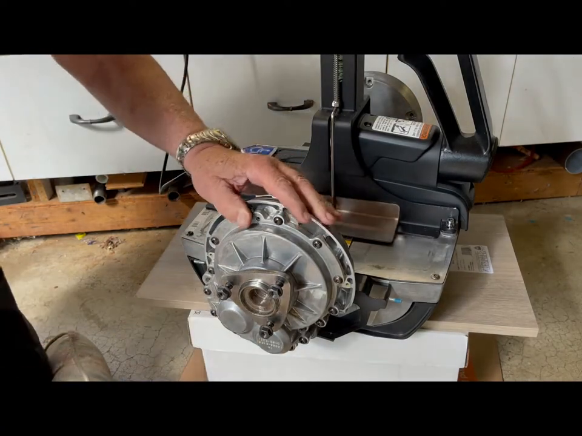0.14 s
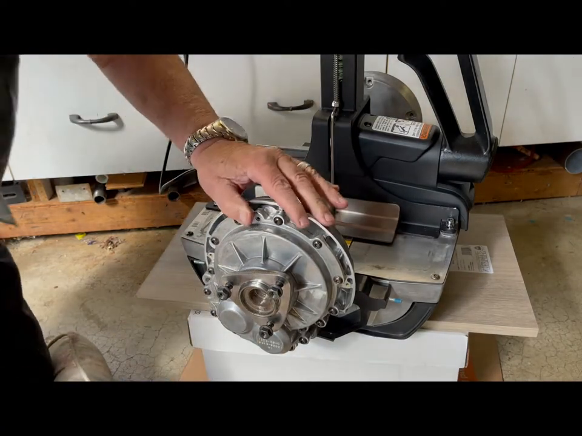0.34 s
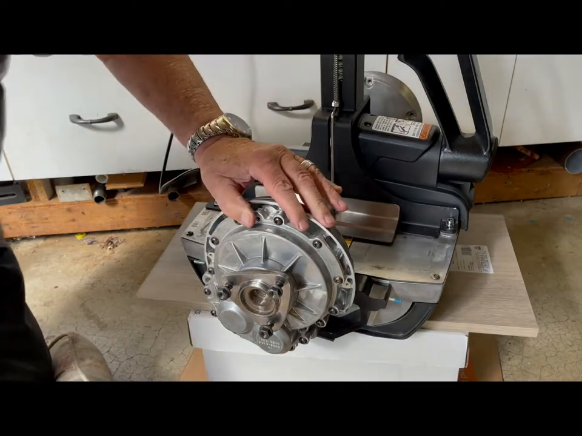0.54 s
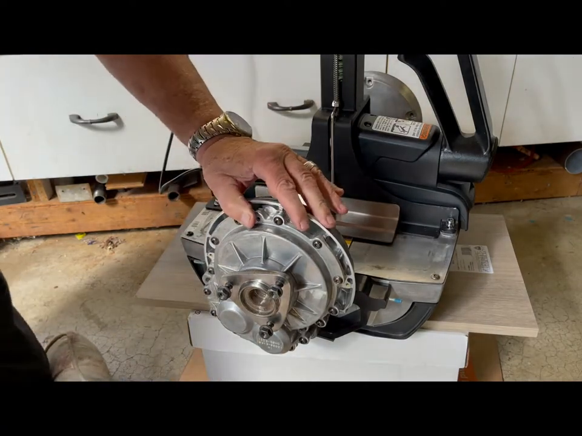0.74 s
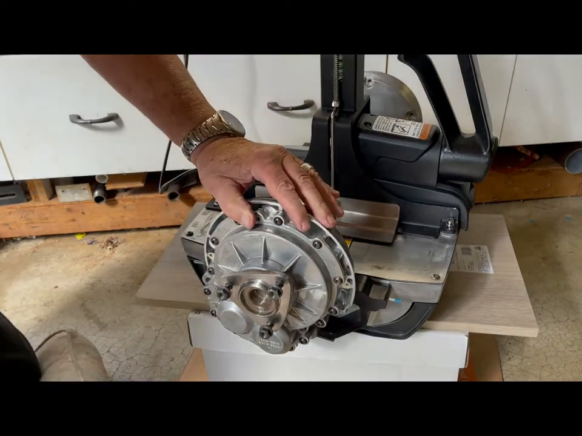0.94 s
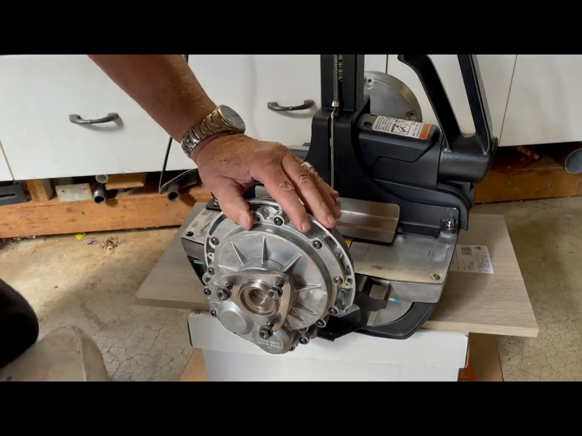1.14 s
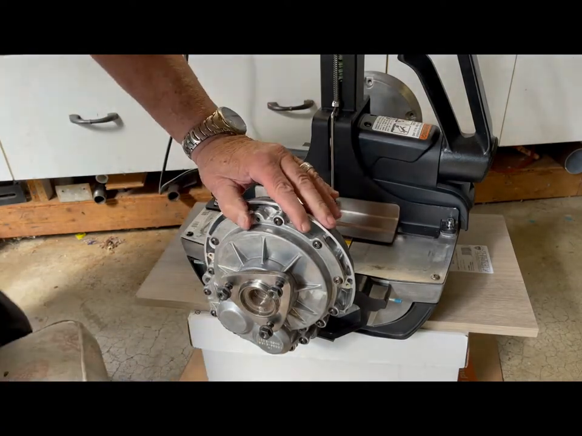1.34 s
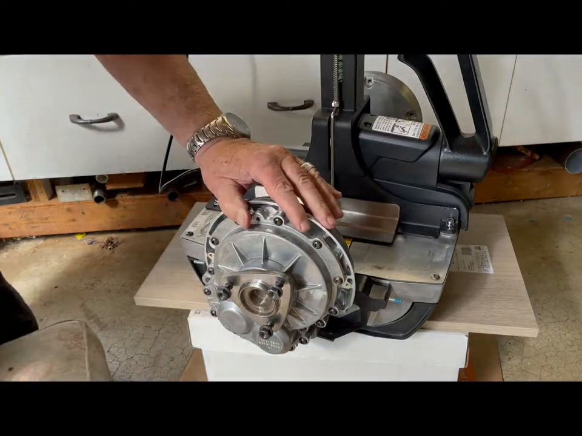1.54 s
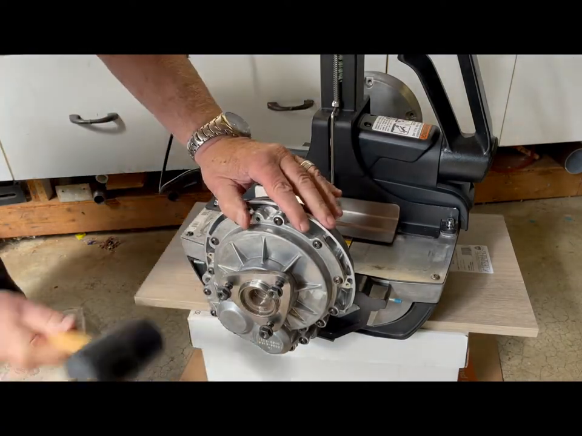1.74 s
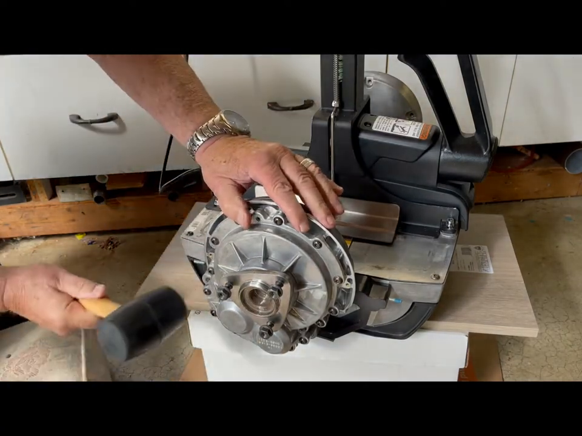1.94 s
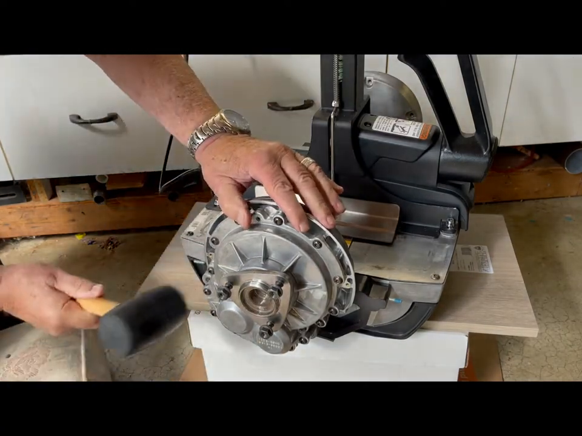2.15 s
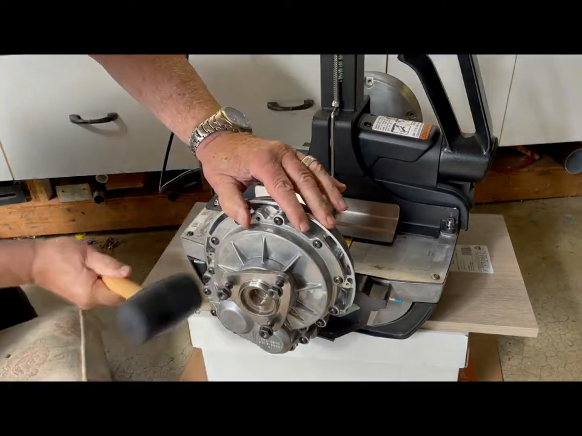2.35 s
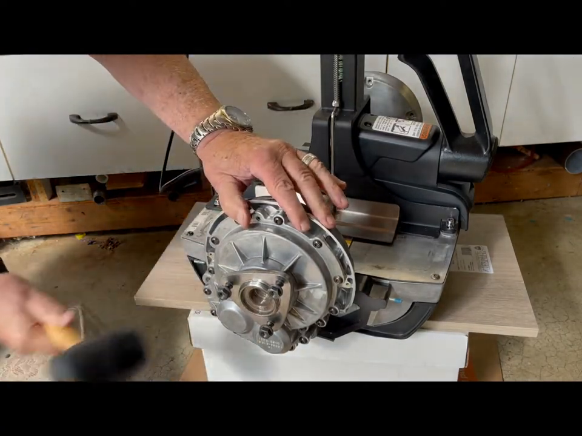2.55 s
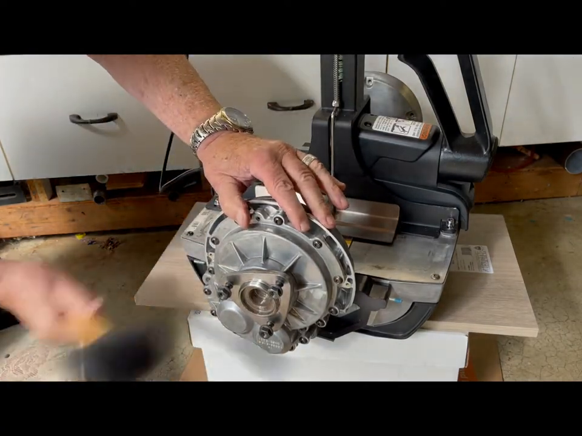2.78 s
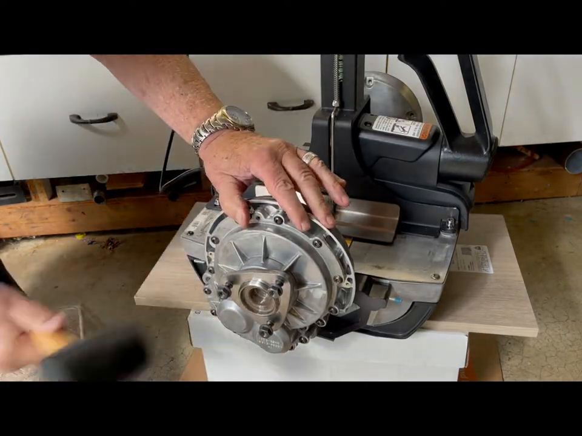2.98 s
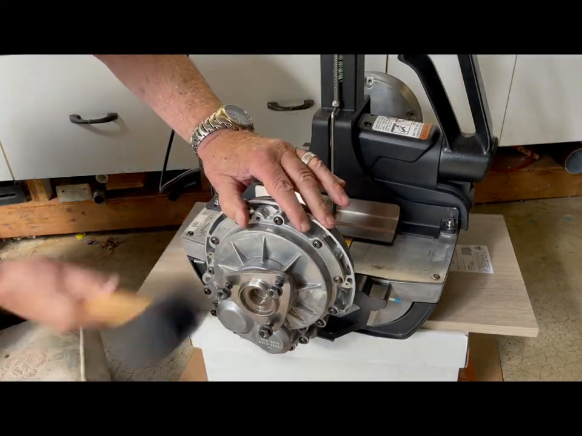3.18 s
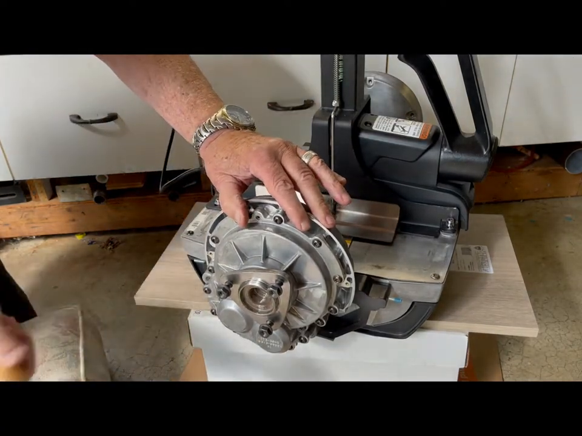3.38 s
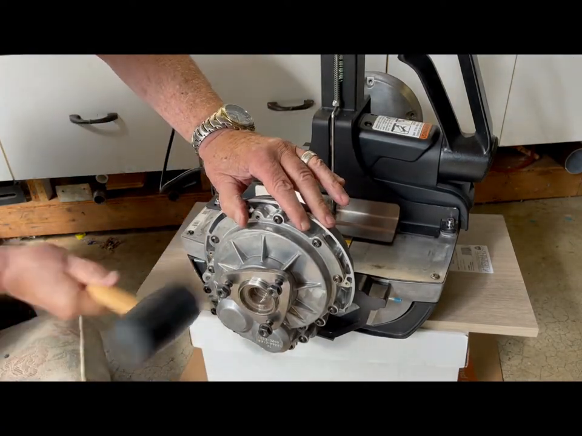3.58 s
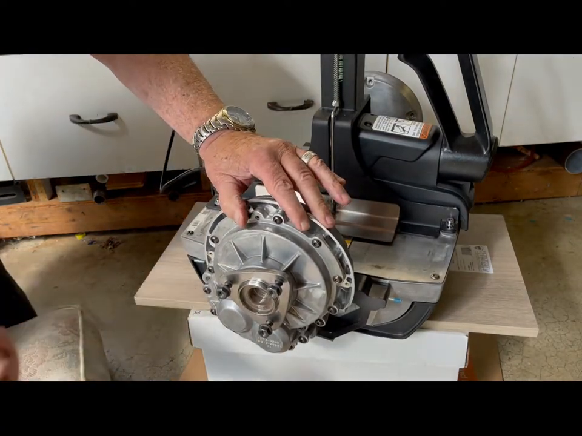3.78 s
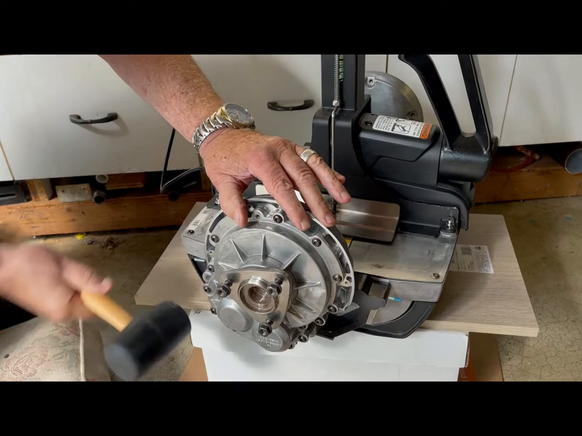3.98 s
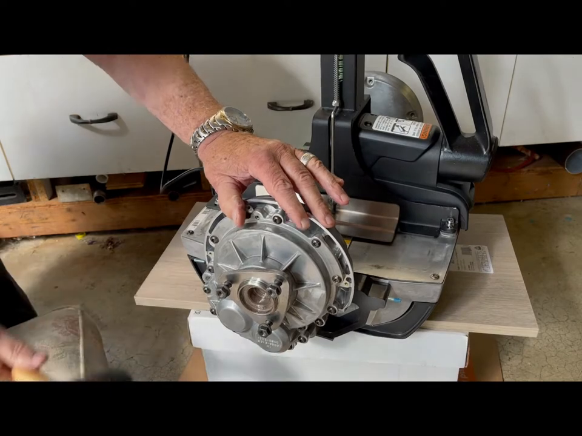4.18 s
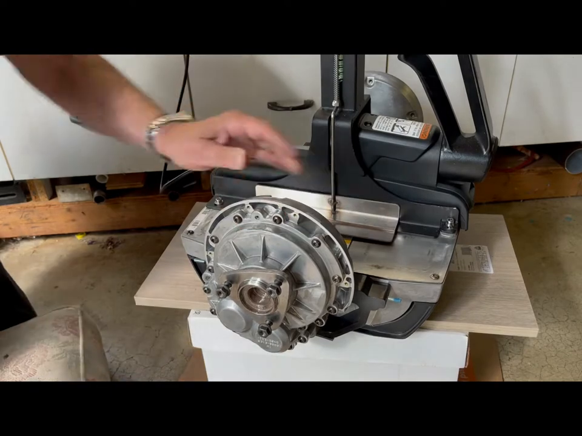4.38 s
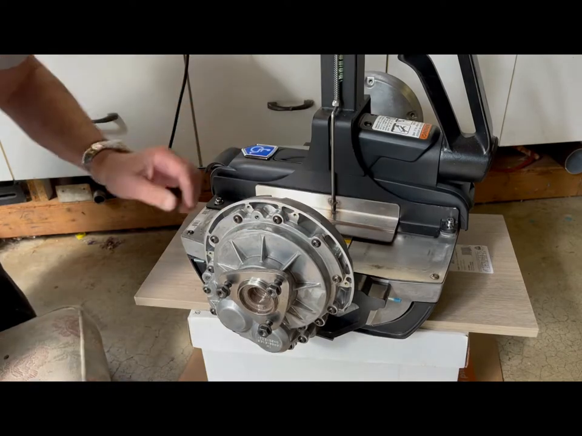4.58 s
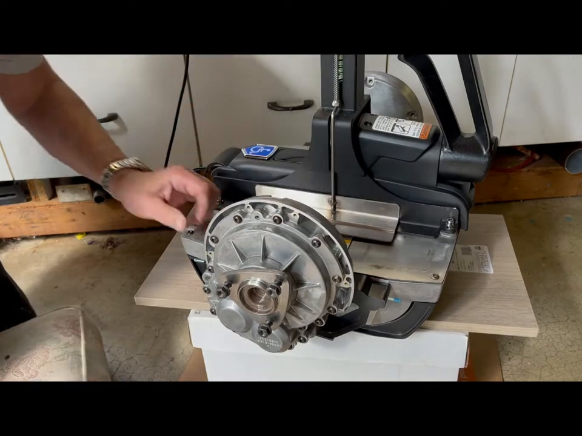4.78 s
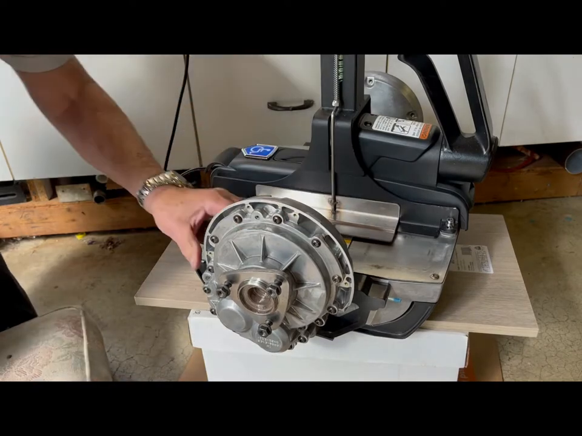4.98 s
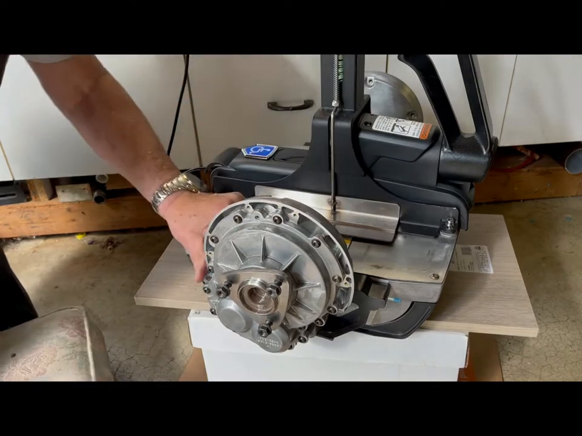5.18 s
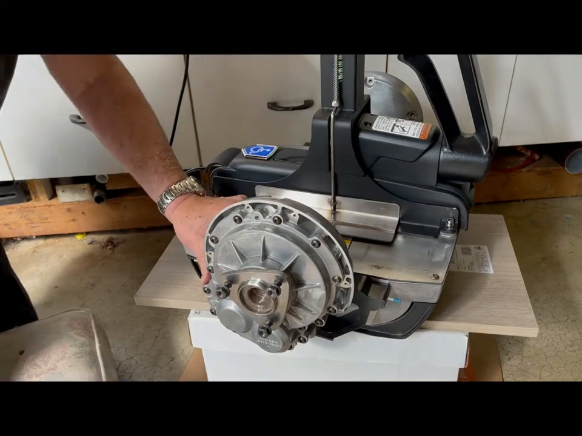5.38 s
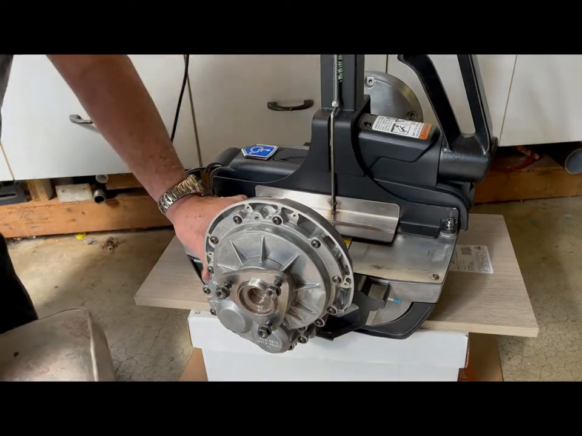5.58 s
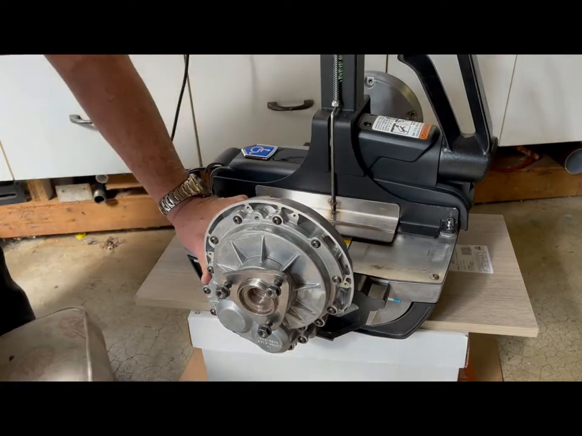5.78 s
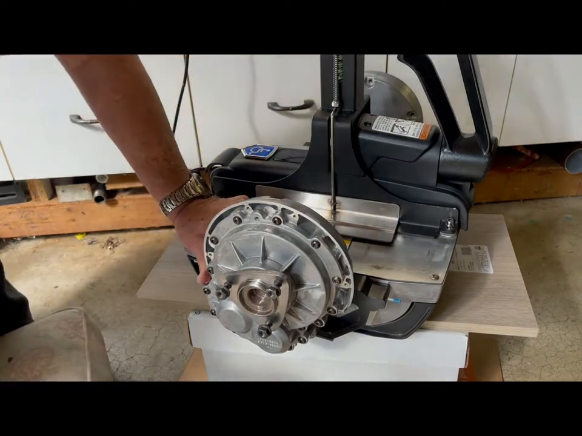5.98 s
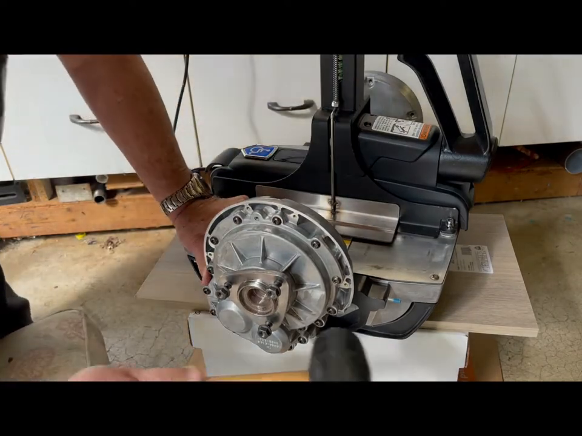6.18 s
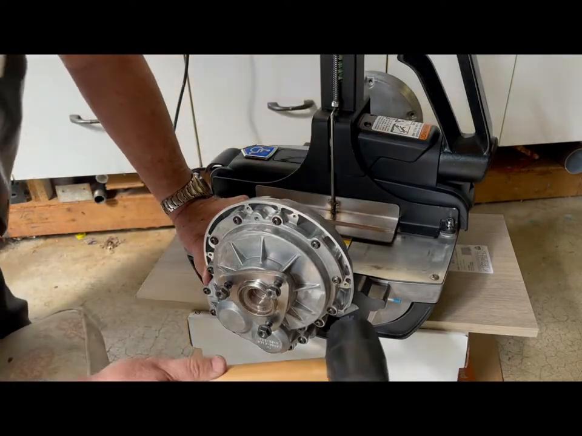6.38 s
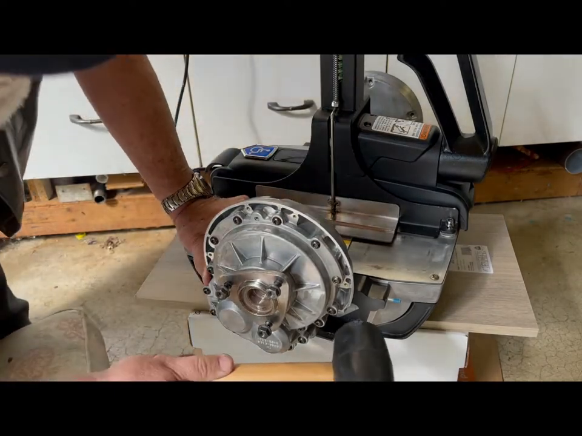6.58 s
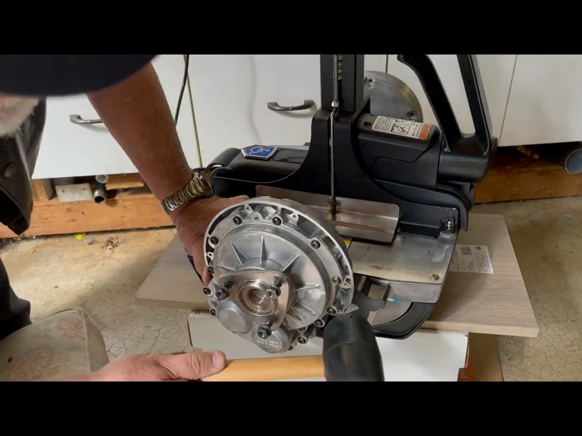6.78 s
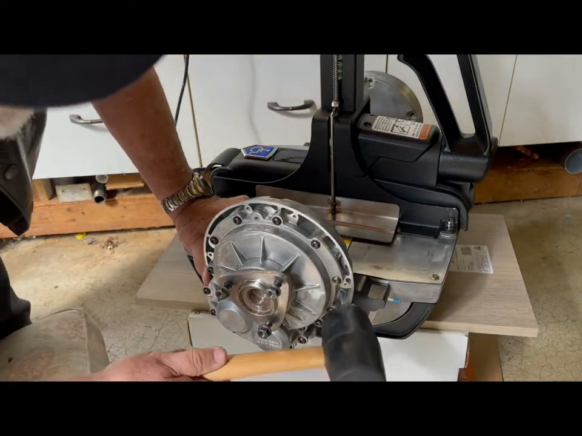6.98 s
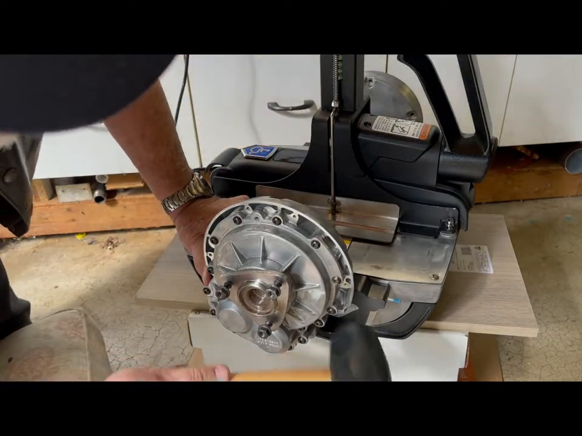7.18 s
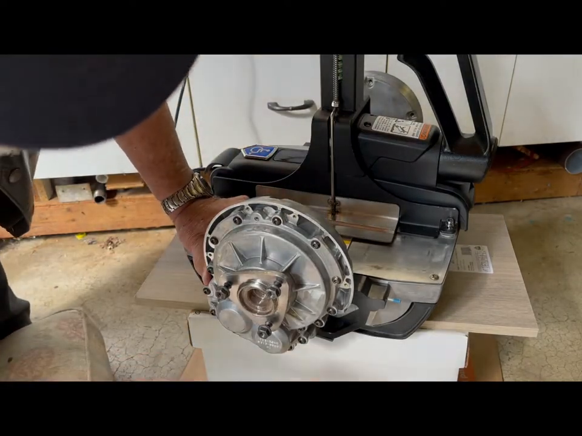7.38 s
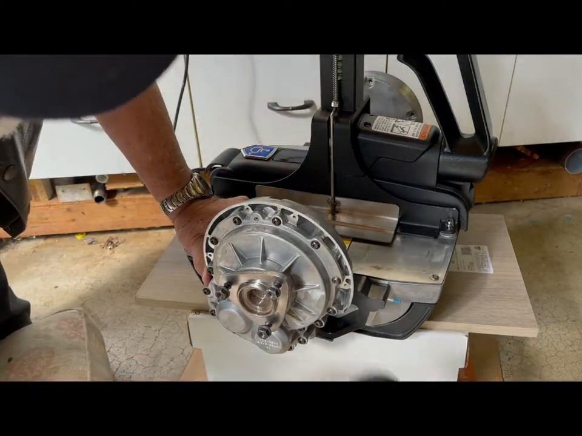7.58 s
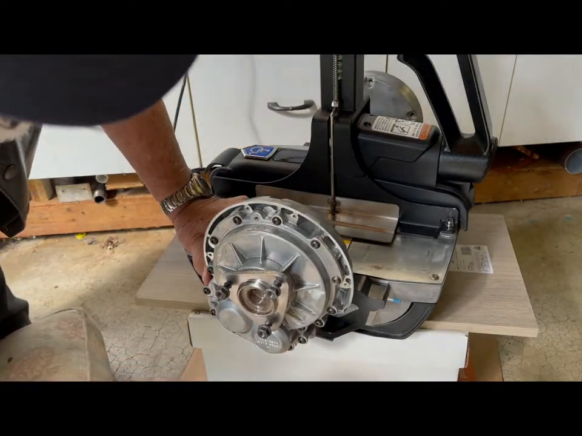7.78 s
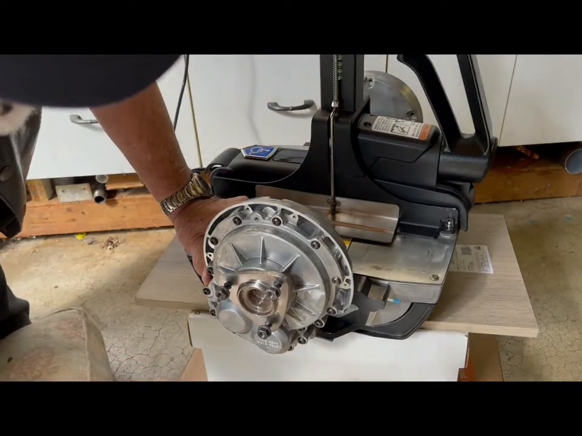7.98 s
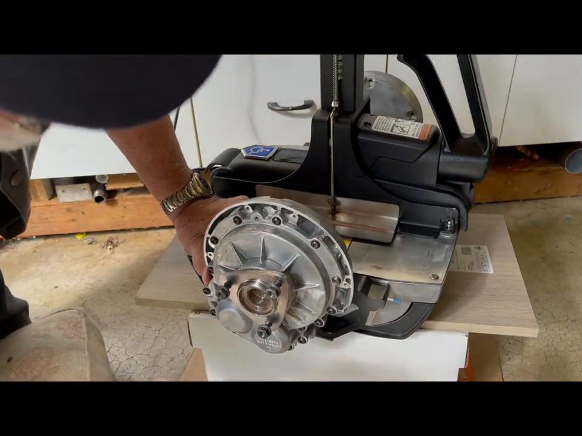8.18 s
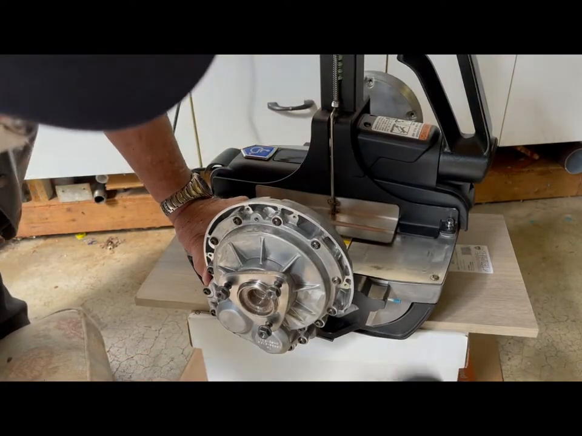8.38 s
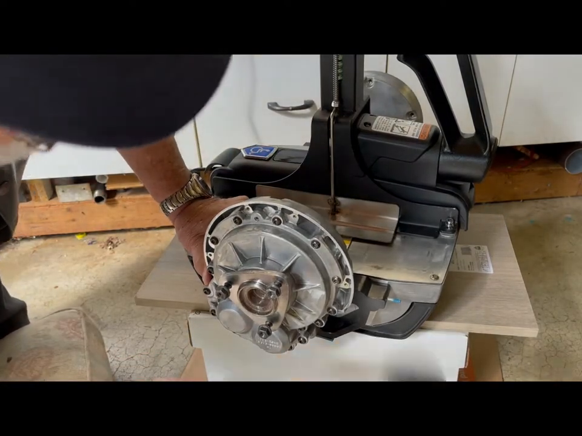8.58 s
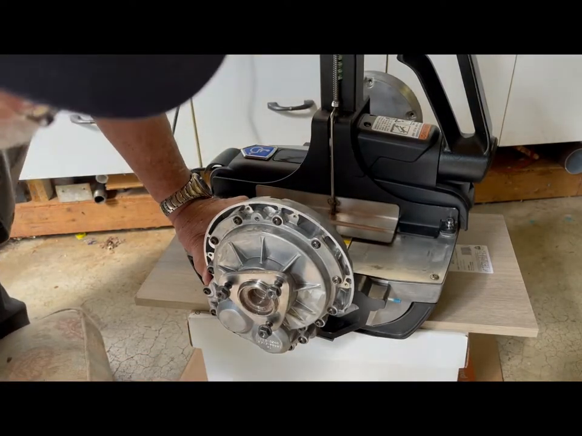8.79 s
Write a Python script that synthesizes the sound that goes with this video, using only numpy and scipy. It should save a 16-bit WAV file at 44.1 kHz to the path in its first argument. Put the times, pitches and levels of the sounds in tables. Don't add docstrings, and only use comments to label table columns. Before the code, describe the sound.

Stereo close pickup, slightly stronger on the left, short room reflections. Soft knocks and crisp cloth movement open, with a brief stuttering scrape gliding upward. Five spaced rubber mallet blows follow on a hollow metal casting resting on a board, hard thunks with brief metallic ring and faint shivering of thin sheet metal. A quieter handling pause has a light clink and rustle, then four evenly spaced blows finish, boardy and rattling.

```python
import sys
import numpy as np
from scipy import signal
from scipy.fft import rfft, irfft, next_fast_len
from scipy.io import wavfile
from scipy.ndimage import uniform_filter1d, map_coordinates

SR = 44100
rng = np.random.default_rng(int(sys.argv[2]) if len(sys.argv) > 2 else 0)


def natural_amplitude(level_db):
    exponent = np.asarray(level_db, float) / 20
    return 10 ** exponent


def int16_out(signal):
    q = np.round(np.clip(np.atleast_2d(signal).T, -1, 1) * 32767)
    wavfile.write(sys.argv[1], SR, q.astype(np.int16))


N = 389830

# [f/Hz, level/dB per Hz]
RUMBLE_SPECTRUM = [(12, -79.5), (20, -49), (43, -3.5), (108, 3.5), (146, -9), (183, -6), (239, -12.5),
                   (275, -8), (350, -17), (460, -52.5), (770, -120)]
# [f/Hz, level/dB per Hz]
WASH_SPECTRUM = [(210, -34.5), (350, -7.5), (439, -5.5), (600, -9), (771, -5), (1210, -8.5), (2730, -27.5),
                 (6410, -48.5), (7000, -65.5), (9100, -84), (15400, -120)]
# [t/s, level/dB]
WASH_LEVEL = [(0, -60.5), (.8, -63), (1.75, -61), (2.2, -63.5), (4.87, -61.5), (6.3, -60.5), (7.9, -58),
              (8.84, -56.5)]
# [f/Hz, T60/s]
ROOM_T60 = [(80, 0.29), (400, 0.29), (1500, 0.26), (5000, 0.29), (11000, 0.33)]
# [f/Hz, correlation/1]
CORRELATION = [(60, 1), (150, 0.84), (380, 0.37), (950, -0.26), (2380, 0.32), (5980, 0.67), (8500, 0.98),
               (15000, 0.77)]
# [f/Hz, level/dB]
PORT_BALANCE = [(60, 0.5), (180, 2), (550, 2), (1650, 2), (3000, 2.1), (4970, 6), (15000, -2.5)]
# [f/Hz, phase/rad]
CASTING_LEAD = [(0, 0.5), (1550, 0.56), (2840, 0.95), (8000, 0.88), (9300, 1.4), (10200, 5.23),
                (11800, 4.9), (16200, 5.5)]

# [peak t/s, swell/s per 20 dB, fade/s per 20 dB, crisp level/dB,
# soft level/dB]
RUSTLE_SWELLS = [(.08, 0.45, 0.25, -63, -69), (.23, 0.14, 0.25, -62, -61), (.41, 0.25, 0.16, -58.5, -65.5),
                    (.482, 0.026, 0.036, -63, -56.5), (.555, 0.17, 0.094, -60.5, -63), (1.13, 0.49, 0.12, -59, -58),
                    (1.21, 0.27, 0.024, -60.5, -61.5), (1.41, 0.29, 0.21, -65, -66), (1.64, 0.16, 0.26, -75, -59.5),
                    (1.76, 0.63, 0.22, -62, -90), (2.075, 0.83, 0.049, -68, -70.5), (2.37, 0.13, 0.28, -62.5, -64),
                    (3.33, 0.073, 0.15, -96, -62),
                    (4.23, .3, 0.37, -78.5, -96), (4.48, 0.12, 0.3, -68, -67), (4.66, 0.21, 0.27, -85, -79),
                 (4.97, 0.14, 0.14, -65.5, -67.5), (5.015, 0.016, 0.39, -63.5, -66.5),
                 (5.185, 0.028, 0.034, -53.5, -66), (5.25, 0.17, 0.52, -66, -65.5), (5.47, 0.19, 0.1, -68, -73.5),
                 (5.8, 0.19, 0.15, -54, -57.5), (6.168, 0.18, 0.35, -67, -69), (6.57, 0.22, 0.15, -86, -89.5),
                 (7, .3, 1.9, -86, -76), (7.921, 0.048, 0.11, -86, -61)]
# [peak t/s, swell/s per 20 dB, fade/s per 20 dB, level/dB]
RUBS = [(.198, 0.015, 0.028, -43.5), (.252, 0.023, 0.015, -42), (.35, 0.92, 0.27, -54),
        (.472, 0.027, 0.13, -44), (.546, 0.26, 0.061, -50), (1.03, 0.18, 0.14, -44),
        (1.155, 0.22, 0.065, -45), (1.212, 0.11, 0.011, -37.5), (1.62, 0.048, 0.13, -42),
        (1.83, 0.25, 0.17, -59.5), (7, 0.27, 0.2, -54)]
# [f/Hz, level/dB per Hz]
CRISP_SPECTRUM = [(4120, -47), (7000, -25.5), (8680, -6.5), (11000, -4), (11400, -13), (12600, -31.5),
                  (13700, -51.5), (14000, -74.5)]
# [f/Hz, level/dB per Hz]
SOFT_SPECTRUM = [(900, -47.5), (1500, 2.5), (2500, 2), (6500, -2), (8000, 2), (9000, -53.5)]
# [f/Hz, level/dB per Hz]
RUB_SPECTRUM = [(59, -31), (100, -39), (146, -7), (247, 0), (433, -4.5), (1720, -20), (2000, -44),
                (2600, -35), (4400, -120)]

# [t/s, peak level/dB, f/Hz, T60/s]
KNOCKS = [(0.191, -36.5, 118, 0.1), (0.243, -27.5, 147, 0.041), (0.261, -28, 45.8, 0.086),
          (0.339, -29, 118, 0.053), (0.468, -37.5, 240, 0.2), (0.557, -37, 143, 0.07),
          (0.769, -39, 327, 0.038), (1.14, -35, 160, 0.044), (1.178, -31.5, 188, 0.049),
          (1.4, -30, 57, 0.042), (1.611, -34.5, 287, 0.081), (4.453, -43.5, 229, 0.16),
          (4.468, -44.5, 310, 0.094), (5.012, -48.5, 615, 0.095), (5.3, -48.5, 400, 0.16),
          (5.291, -43, 119, 0.13), (7.037, -26.5, 114, 0.024)]
# [t/s, peak level/dB, f/Hz]
TICKS = [(0.191, -43, 9900), (0.4788, -38.5, 8650), (2.0166, -52, 9800), (2.076, -49, 9800),
         (2.4164, -44.5, 3640), (4.372, -48.5, 8600), (4.4356, -48.5, 8250), (4.4894, -48, 5230),
         (4.6505, -46.5, 7970), (5.6156, -49, 10700), (8.402, -44, 8600)]
# [t/s, peak level/dB, f/Hz]
TAPS = [
    (0.1914, -44, 700),
    (.249, -41, 880),
    (0.768, -42, 1040),
    (2.421, -31.5, 580),
    (3.2033, -41.5, 1090),
    (3.2035, -49.5, 2500),
    (4.455, -45.5, 745),
    (5.282, -47, 1010),
]
# [t/s, f/Hz, level/dB, length/s]
SQUEAKS = [
    (4.462, 1240, -51.5, 0.029),
    (4.535, 3330, -68, .11),
    (4.538, 2850, -72, .09),
]
# [t/s, ring level/dB, rise/s, scuff level/dB]
CLINKS = [
    (5.007, -67, 0.014, -43.5),
    (5.057, -57, 0.0044, -75),
    (5.173, -47, 0.0052, -61.5),
    (5.21, -67, 0.0034, -70),
]
# [f/Hz, level/dB, T60/s]
LOOSE_PART_MODES = [(423, -1, 0.1), (824, -12, .06), (1190, -10, .25), (1405, -15, .3), (1710, 0, 0.2),
                    (2070, 0, 0.14), (2191, -22, 0.24), (2590, -2, 0.12), (3020, -1, 0.15),
                    (3380, -14, .08), (3850, 5.5, 0.077), (4460, -15, .1), (5280, -8, 0.14)]
# [f/Hz, level/dB per Hz]
SCUFF_SPECTRUM = [(530, -36), (900, -24), (1560, 0), (2260, -16), (2930, -13.5), (6980, -23.5),
                  (10900, -18.5), (12000, -46), (15600, -78), (22000, -120)]
# [t/s, from f/Hz, to f/Hz, level/dB, length/s]
SKID = (5.172, 3500, 2500, -50, .022)
# [t/s, f/Hz, level/dB]
SCRAPE_GLIDE = [
    (.97, 247, -66),
    (1.03, 303.3, -45.5),
    (1.075, 384.5, -38),
    (1.108, 513, -38.5),
    (1.155, 817, -36.5),
    (1.19, 956, -48.5),
    (1.22, 1080, -74),
]
# [t/s, level/dB]
SCRAPE_BITES = [
    (1.027, 2),
    (1.045, 0),
    (1.071, 0.5),
    (1.092, -5),
    (1.107, 3.5),
    (1.137, -1),
    (1.155, -0.5),
    (1.176, 2.5),
]

# [t/s, level/dB re slam]
EDGE_TOUCHES = [
    (2.3662, -4),
    (2.8362, -8),
    (3.2136, -14),
    (3.5873, -8),
    (3.9688, -6),
    (7.489, -8),
    (7.8665, -12),
    (8.2655, -14),
    (8.6472, -12),
]
# [t/s, cover peak/dB, board/dB re cover, shell/dB re cover, rim/dB re cover]
BLOWS = [
    (2.37, -31.5, 10.5, -9, -0.5),
    (2.837, -8, -12, -12, -11),
    (3.2148, -14.5, -14, -9.5, -2.5),
    (3.587, -6, -12.5, -5.5, -13),
    (3.9711, -13.5, -3.5, -2.5, -4),
    (7.4912, -12, -6, -7, -11.5),
    (7.869, -7, -9, -3, -4),
    (8.2675, -17.5, -0.5, 3, -2),
    (8.648, -15, -4, 2.5, 0),
]
# [t/s, rib peak/dB, fins/dB re ribs, crack/dB re ribs, contact/ms]
CONTACTS = [
    (2.3715, -32, -7, -6.5, 0.99),
    (2.8384, -21.5, -7.5, -6, 4.2),
    (3.2141, -11.5, -10.5, -7, 1.13),
    (3.5874, -20.5, -4, -4, 2.47),
    (3.9709, -18, -6.5, -4.5, 1.5),
    (7.4939, -30, -8.5, 1, 2.2),
    (7.8695, -21, -8, -3.5, 1.8),
    (8.2656, -13.5, 1, -8, 0.79),
    (8.6472, -16.5, -1.5, -3.5, 1.66),
]
# [level/dB re slam, rib pitch ratio/1]
RATTLES = [
    (-23, 1.06),
    (-11.5, 0.85),
    (-18, 0.9),
    (-14, 1),
    (-11.5, 0.63),
    (-6, 1.42),
    (-8.5, 1.37),
    (-20, .95),
    (-21, 1.54),
]
# [free ring/ms, residual/dB, cover pitch ratio/1, stand/dB, casting into room/dB]
GRIPS = [
    (7.7, -4.5, 1.054, 0.5, 5.5),
    (8.5, -11, 1.1, 0, 3),
    (4.8, -11, .97, 4, -0.5),
    (12, -9, 1.07, -1.5, -0.5),
    (5.5, -7, .97, 3, -1.5),
    (7.7, -6.5, 1.02, -2, 2),
    (4.8, -5.5, .96, -0.5, 0.5),
    (3.4, -6, 1.04, 5.5, -2.5),
    (4.6, -6.5, 1.1, 3.5, -1),
]
# [f/Hz, level/dB per Hz]
SLAP_SPECTRUM = [(2940, -14), (5000, -4.5), (7610, -8.5), (8450, -0.5), (10400, 2.5), (11800, -7.5),
                 (15000, -48.5), (16500, -62.5)]
# [f/Hz, level/dB, T60/s]
STAND_MODES = [(67.8, -4.5, 0.28), (84.7, 3, 0.13), (123.4, 8, 0.051)]
# [f/Hz, level/dB, T60/s]
BOARD_MODES = [(161, 2.5, 0.057), (204.4, -10.5, 0.13), (250.6, 0, 0.094), (315, -5, 0.083)]
# [f/Hz, level/dB, T60/s]
SHELL_MODES = [(399, -1.5, 0.031), (450.3, -1, 0.074), (506.4, -7.5, 0.092)]
# [f/Hz, level/dB, T60/s]
COVER_MODES = [(577.3, -0.5, 0.055), (627.6, -5, 0.056), (700, -11, 0.076)]
# [f/Hz, level/dB, T60/s]
RIM_MODES = [(777.6, -3, 0.11), (883.5, -3.5, 0.083), (956, -2.5, 0.056), (1107, -10, 0.11),
             (1254, -10, 0.088), (1331, -7.5, 0.073)]
# [f/Hz, width/Hz, level/dB]
RIBS = [(1380, 380, 4.5), (1790, 370, 4), (2005, 300, 4.5), (2500, 203, 2.5), (2720, 570, -2)]
# [f/Hz, width/Hz, level/dB]
FINS = [(3010, 340, 2.5), (3344, 670, -0.5), (4020, 580, -1), (4380, 420, -1), (4540, 540, 0.5),
        (5370, 690, -9.5), (6630, 160, -18)]
# [f/Hz, width/Hz, level/dB]
GUARD = [(900, 220, -7), (1390, 150, -1.5), (1540, 100, -1.5), (2000, 170, -2), (2370, 150, -3.5),
         (2920, 200, -11), (3870, 250, -14.5)]
# [t/s, level/dB, T60/s]
SHIVERS = [
    (2.845, -52, 0.49),
    (3.222, -36.5, 0.57),
    (3.597, -46.5, 0.41),
    (3.98, -47, 0.43),
    (7.5, -52, .4),
    (7.878, -44, 0.49),
    (8.275, -47, 0.37),
    (8.657, -43.5, 0.42),
]
# [t/s, f/Hz, level/dB, T60/s]
BLADE = [
    (2.84, 531, -39, 0.75),
    (3.3, 530, -41.5, 1),
]
# [t/s, peak level/dB, f/Hz, T60/s]
BOUNCES = [(2.8442, -2.5, 651, 0.022), (2.845, -15.5, 277, 0.051), (2.862, -22, 638, 0.036),
           (3.221, -17.5, 165, 0.031), (3.596, -16.5, 275, 0.062), (3.5943, -8.5, 651, 0.018),
           (3.9794, -9.5, 290, 0.025), (7.5003, -6, 236, 0.044), (7.879, -6, 152.4, 0.037),
           (8.2763, -12, 144, 0.039), (8.6581, -8.5, 146, 0.055)]
# [t/s, f/Hz, level/dB, T60/s]
SPARKS = [(2.838, 2000, -23.5, 0.037), (2.843, 10500, -41.5, 0.071), (3.2147, 2460, -16.5, 0.031),
          (3.217, 1920, -21, 0.024), (3.591, 10960, -34.5, 0.054), (3.971, 9600, -22, .07),
          (3.604, 757, -16, 0.027), (7.506, 780, -21, 0.028), (7.492, 1970, -27, 0.026),
          (8.272, 740, -16, .04), (3.2145, 820, -20, 0.034), (7.885, 1950, -24, .03),
          (3.9705, 1400, -23, 0.018), (7.83, 1240, -19, .03), (8.266, 2900, -14, 0.018),
          (8.3, 1350, -19.5, 0.025), (8.12, 8850, -30, 0.029), (8.65, 3770, -10, 0.019),
          (8.66, 9800, -32, .04)]

TWIN_RATIO = 1.04


def unit(x):
    return x / np.sqrt(np.mean(x ** 2) + 1e-20)


def along(points, hz):
    f, v = np.transpose(points)
    return np.interp(np.log(hz + 1), np.log(f + 1), v)


def curves(rows, silent=None):
    s, *cols = np.transpose(rows)
    return [np.interp(np.arange(N) / SR, s, c, silent, silent) for c in cols]


def wobble(rate_hz):
    knots = rng.standard_normal(int(N * rate_hz / SR) + 4)
    return map_coordinates(knots, [np.arange(N) * rate_hz / SR])


def filtered(x, response):
    n = x.shape[-1]
    m = next_fast_len(n + SR // 4)
    return irfft(rfft(x, m) * response(np.fft.rfftfreq(m, 1 / SR)), m)[..., :n]


def noise(spectrum, count):
    return unit(filtered(rng.standard_normal(count), lambda hz: natural_amplitude(along(spectrum, hz))))


def rush(spectrum, patchy_db):
    z = signal.stft(rng.standard_normal((2, N + SR)), nperseg=512)[2]
    field = uniform_filter1d(rng.standard_normal(z.shape[1:]), size=6, axis=0)
    field = uniform_filter1d(field, size=10, axis=1)
    pair = signal.istft(z * natural_amplitude(patchy_db * unit(field)), nperseg=512)[1][:, :N]

    def mid_side(hz):
        turn = np.arccos(np.clip(along(CORRELATION, hz), -1, 1)) / 2
        return natural_amplitude(along(spectrum, hz)) * [np.cos(turn), np.sin(turn)]

    mid, side = filtered(pair, mid_side)
    return unit(np.array([mid + side, mid - side]))


def even(bursts):
    z = rfft(bursts)
    smooth = uniform_filter1d(np.abs(z) ** 2, size=150, axis=-1)
    count = bursts.shape[-1]
    flat = irfft(z * np.sqrt(smooth.mean(axis=-1, keepdims=True) / smooth), count)
    return flat * (np.arange(count) < count * 3 // 4)


def resonances(peaks):
    def response(f):
        total = 0
        for k, (c, w, db) in enumerate(peaks):
            total = total + (-1) ** k * natural_amplitude(db) * 1j * f * w / (c * c - f * f + 1j * f * w)
        return total
    return response


def ring(modes, t, rise_s, spread_db):
    hz, db, t60 = np.transpose(modes)[..., None]
    level_luck, pitch_luck, phase_luck = rng.standard_normal((3, len(modes), 1))
    knots = rng.standard_normal((len(modes), 100))
    flutter = np.array([np.interp(90 * t, np.arange(len(k)), k) for k in knots])
    flutter = 0.99 * flutter * (1 - np.exp(-t / 0.015))
    phase = 2 * np.pi * hz * (1 + 0.01 * pitch_luck) * t + 0.28 * phase_luck + flutter
    sines = natural_amplitude(db + spread_db * level_luck - 60 * t / t60) * np.sin(phase)
    return sines.sum(axis=0) * (1 - np.exp(-t / rise_s)) ** 2


def add(track, s, sound):
    part = track[..., round(s * SR):][..., :sound.shape[-1]]
    part += sound[..., :part.shape[-1]]


def strokes(rows):
    t = np.arange(0, N + 64, 64) / SR
    s, swell, fade, *levels = np.transpose(rows)[..., None]
    away = np.where(t < s, (s - t) / swell, (t - s) / fade)
    drop_db = 20 * away ** 1.05
    return [np.interp(np.arange(N) / SR, t, natural_amplitude(db - drop_db).sum(axis=0)) for db in levels]


def lead(x, radians):
    return filtered(x, lambda hz: np.exp(np.outer([.5j, -.5j], radians(hz))))


def shop(x):
    hz, t, z = signal.stft(rng.standard_normal((2, SR // 2)), SR, nperseg=256)
    decay = natural_amplitude(-60 * t / along(ROOM_T60, hz)[:, None])
    mid, side = signal.istft(z * decay, SR, nperseg=256)[1]
    tail = np.array([mid + 0.33 * side, mid - 0.63 * side]) / np.linalg.norm(mid)
    return signal.fftconvolve(np.pad(x, (SR // 200, 0))[None], tail, axes=1)


def rumble():
    return natural_amplitude(-50 + 0.29 * wobble(0.91) + 1.1 * wobble(4.7)) * rush(RUMBLE_SPECTRUM, patchy_db=2.0)


def outdoor_wash():
    level_db = curves(WASH_LEVEL)[0] + 4.5 + 0.21 * wobble(3.8)
    return natural_amplitude(level_db) * rush(WASH_SPECTRUM, patchy_db=1.16)


def cloth():
    swing_s, recoil_s = 0.27, 0.35
    side_db, front_db = (-65.5, -68.5), (-77, -76.5)
    swings = [(s, swing_s, recoil_s, *(side_db if s < 5 else front_db)) for s, *_ in BLOWS[1:]]
    crisp, soft = strokes(RUSTLE_SWELLS + swings)
    grain = unit(natural_amplitude(0.46 * wobble(40) + 1.1 * wobble(400)))
    hiss = natural_amplitude(6.0) * crisp * rush(CRISP_SPECTRUM, patchy_db=3.5)
    hiss = hiss + natural_amplitude(3.5) * soft * rush(SOFT_SPECTRUM, patchy_db=2.5)
    rub, = strokes(RUBS)
    rubbing = natural_amplitude(-1.5 + 2.2 * wobble(59.86)) * rub * rush(RUB_SPECTRUM, patchy_db=0.0)
    return grain * hiss + rubbing


def handling():
    track, t = np.zeros(N), np.arange(SR // 3) / SR
    for s, db, hz, t60 in KNOCKS:
        modes = [(hz, 2, t60), (2.32 * hz, -8, .5 * t60), (3.77 * hz, -14, 0.56 * t60)]
        add(track, s, natural_amplitude(db) * ring(modes, t, 0.001, spread_db=3.0))
    for s, db, hz in TICKS:
        tick = np.sin(2 * np.pi * hz * t) + 0.44 * rng.standard_normal(len(t))
        add(track, s, natural_amplitude(db - 60 * t / 0.013) * tick)
    for s, db, hz in TAPS:
        add(track, s, natural_amplitude(db) * ring([(hz, 0, .04), (0.41 * hz, -4, .04)], t, 0.00076, spread_db=-1.0))
    for s, hz, db, length_s in SQUEAKS:
        swell = np.sin(np.pi * np.clip(t / length_s, 0, 1))
        add(track, s, swell * ring([(hz, db, 3), (TWIN_RATIO * hz, db - 12, 3)], t, .005, spread_db=1))
    for s, ring_db, rise_s, scuff_db in CLINKS:
        scuff = natural_amplitude(scuff_db) * noise(SCUFF_SPECTRUM, count=len(t)) / (1 + (t / 0.027) ** 6)
        add(track, s, natural_amplitude(ring_db) * ring(LOOSE_PART_MODES, t, rise_s, spread_db=1.5) + scuff)
    return track


def skid():
    s, from_hz, to_hz, db, length_s = SKID
    u = np.clip((np.arange(N) / SR - s) / length_s, 0, 1)
    hz = from_hz * (to_hz / from_hz) ** u * (1 + 0.085 * wobble(300))
    return natural_amplitude(db) * np.sin(np.pi * u) * np.sin(2 * np.pi * np.cumsum(hz) / SR)


def scrape():
    hz, db = curves(SCRAPE_GLIDE)[0], curves(SCRAPE_GLIDE, silent=-120)[1]
    t = np.arange(N) / SR
    sliding_db, bite_s = -6, 0.0077
    bite = natural_amplitude(sliding_db) + sum(natural_amplitude(d) * np.exp(-((t - s) / bite_s) ** 2) for s, d in SCRAPE_BITES)
    phase = 2 * np.pi * np.cumsum(hz * (1 + 0.13 * wobble(190))) / SR
    tone = np.sin(phase) + natural_amplitude(-3.0) * (300 / hz) ** 2 * np.sin(2 * phase)
    return natural_amplitude(db + 0.5 + 1.5 * wobble(70.2)) * bite * tone


def edge_scuffs():
    track, t = np.zeros(N), np.arange(SR // 20) / SR
    for (s, db), (_, rib_db, _, crack_db, _) in zip(EDGE_TOUCHES, CONTACTS):
        scuff = filtered(rng.standard_normal(len(t)), resonances(RIBS + FINS))
        scuff = scuff + natural_amplitude(crack_db) * noise(SLAP_SPECTRUM, count=len(t))
        rim = natural_amplitude(-2.5) * ring(RIM_MODES, t, 0.00068, spread_db=3.5)
        add(track, s, natural_amplitude(rib_db + db + 6.5 - 60 * t / 0.029) * (scuff + rim))
    return track


def rebounds():
    track, t = np.zeros(N), np.arange(SR // 8) / SR
    for s, db, hz, t60 in BOUNCES:
        modes = [(hz, 2.5, t60), (2.2 * hz, -9, 0.72 * t60)]
        add(track, s, natural_amplitude(db) * ring(modes, t, 0.00074, spread_db=0))
    for s, hz, db, t60 in SPARKS:
        modes = [(hz, db, t60), (TWIN_RATIO * hz, db - 2, t60)]
        add(track, s, ring(modes, t, 0.00063, spread_db=1.6))
    return track + natural_amplitude(-15.5) * shop(track)[:, :N]


def sympathetic():
    track, t = np.zeros((2, N)), np.arange(SR // 2) / SR
    for s, db, t60 in SHIVERS:
        mid, side = unit(filtered(rng.standard_normal((2, len(t))), resonances(GUARD)))
        envelope = natural_amplitude(db - 60 * t / t60) * (1 - np.exp(-t / .006))
        add(track, s, envelope * (mid + np.outer([.3, -.3], side)))
    for s, hz, db, t60 in BLADE:
        envelope = natural_amplitude(db - 60 * t / t60) * (1 - np.exp(-t / .05)) * (1 - 2 * t)
        add(track, s, np.sin(2 * np.pi * hz * t) * envelope)
    return track


def bench(t, board_db, stand_db):
    board = natural_amplitude(board_db + 4.5) * ring(BOARD_MODES, t, 0.0041, spread_db=0.37)
    return board + natural_amplitude(board_db + stand_db) * ring(STAND_MODES, t, 0.0041, spread_db=0.37)


def casting(t, contact_s, shell_db, rim_db, bend, held_ms, left_db):
    cover = natural_amplitude(5.0) * ring(np.multiply(COVER_MODES, [bend, 1, 1]), t, contact_s, spread_db=0.37)
    shell = natural_amplitude(shell_db + 5.0) * ring(SHELL_MODES, t, contact_s, spread_db=0.37)
    rim = natural_amplitude(rim_db - 1.0) * ring(RIM_MODES, t, .5 * contact_s, spread_db=0.37)
    choke = natural_amplitude(left_db * (1 - 1 / (1 + (1000 * t / held_ms) ** 6)))
    return choke * (cover + shell + rim)


def chatter(t, fin_db, crack_db, rattle_db, pitch):
    slam = natural_amplitude(-60 * t / 0.038)
    rattle = natural_amplitude(rattle_db - 60 * t / 0.15)
    fade = (1 - np.exp(-t / 0.0002)) * (slam + rattle)
    on_ribs, on_fins = even(fade * rng.standard_normal((2, len(t))))
    ribs = natural_amplitude(5.5) * filtered(on_ribs, resonances(np.multiply(RIBS, [pitch, pitch, 1])))
    fins = natural_amplitude(fin_db + 5.0) * filtered(on_fins, resonances(FINS))
    return ribs + fins + natural_amplitude(crack_db - 2.0) * fade * noise(SLAP_SPECTRUM, count=len(t))


def bass_thinned(x):
    return filtered(x, lambda hz: (1j * hz / (58 + 1j * hz)) ** 3)


def mallet():
    track, t = np.zeros((2, N)), np.arange(SR // 2) / SR
    for blow, contact, rattle, grip in zip(BLOWS, CONTACTS, RATTLES, GRIPS):
        s, db, board_db, shell_db, rim_db = blow
        _, rib_db, fin_db, crack_db, contact_ms = contact
        held_ms, left_db, bend, stand_db, room_db = grip
        metal = natural_amplitude(db + 6.0) * casting(t, contact_ms / 1000, shell_db, rim_db, bend, held_ms, left_db)
        rest = natural_amplitude(db + 5.5) * bench(t, board_db, stand_db)
        rest = rest + natural_amplitude(rib_db + 4.5) * chatter(t, fin_db, crack_db, *rattle)
        to_room = natural_amplitude(room_db + 6.0 - 60 * t / 0.04) * metal + rest
        add(track, s + .0004, bass_thinned(metal + rest))
        add(track, s, natural_amplitude(-13.0) * shop(bass_thinned(to_room)))
    return track + sympathetic() + rebounds()


def scene():
    near = handling() + scrape() + skid()
    around = near + natural_amplitude(-8.5) * shop(near)[:, :N] + cloth() + rumble() + outdoor_wash()
    struck = mallet() + edge_scuffs()

    def struck_lead(hz):
        return along(CASTING_LEAD, hz) * np.clip(hz / 1000, 0, 1)

    def around_lead(hz):
        return 2 * np.pi * hz / SR / (1 + (hz / 4965) ** 4)

    return lead(struck, struck_lead) + lead(around, around_lead)


def low_pass(x):
    return signal.sosfilt(signal.butter(12, 16650, fs=SR, output="sos"), x)


def record(dry):
    low_hz, top_hz, gap_hz, gap_width_hz = 40.5, 12200, 10280, 190

    def response(hz):
        ports = natural_amplitude(np.outer([.5, -.5], along(PORT_BALANCE, hz)))
        gap = 1 - np.exp(-((hz - gap_hz) / gap_width_hz) ** 4)
        bass = (1j * hz / (low_hz + 1j * hz)) ** 2
        return ports * gap * bass / (1 + (hz / top_hz) ** 16)

    x = filtered(dry, response)
    mix = x / (1 + np.abs(x / .95) ** 4) ** (1 / 4)
    return low_pass(mix)


dry = scene()
out = record(dry)
int16_out(out)
```